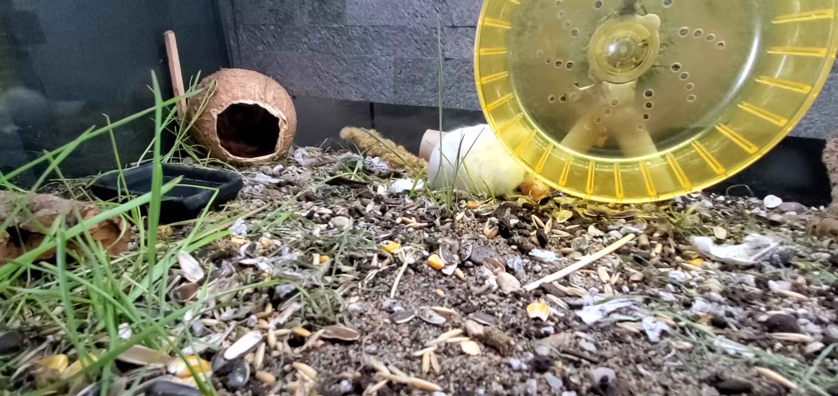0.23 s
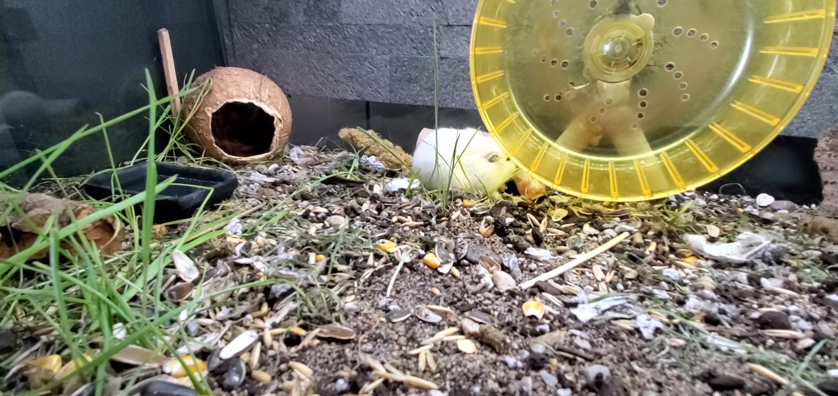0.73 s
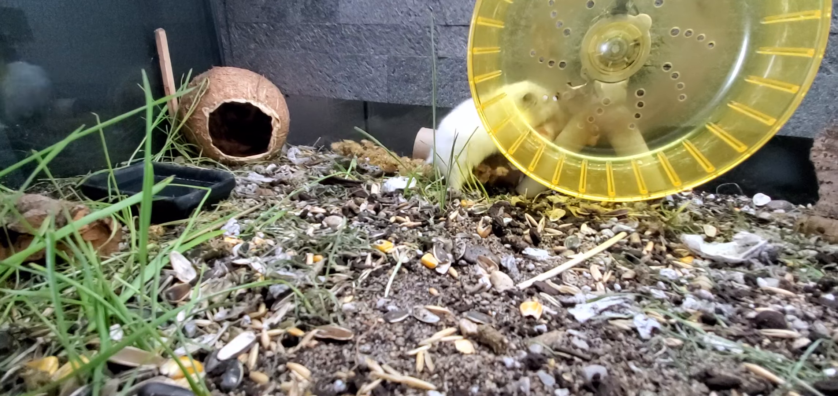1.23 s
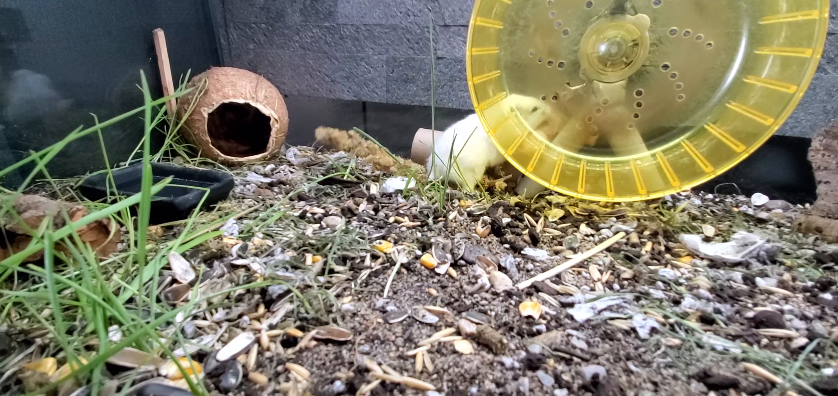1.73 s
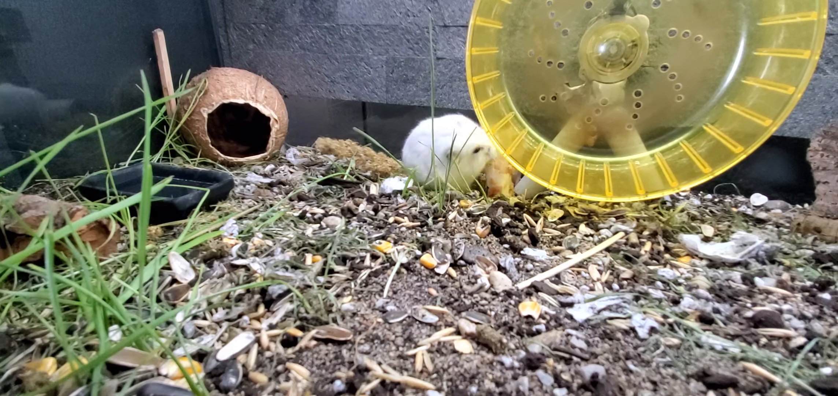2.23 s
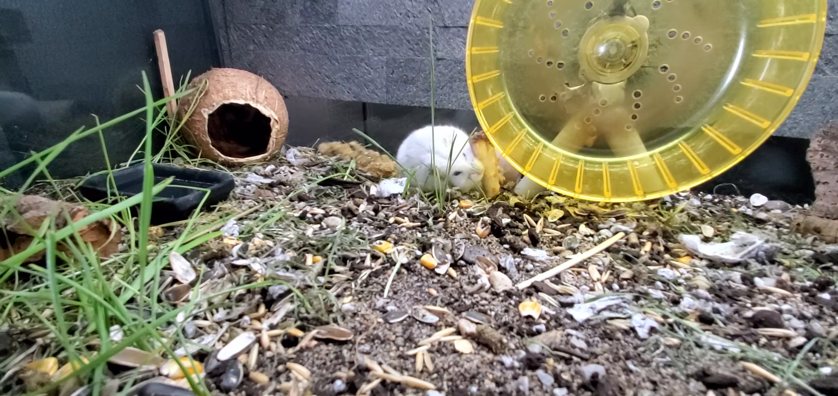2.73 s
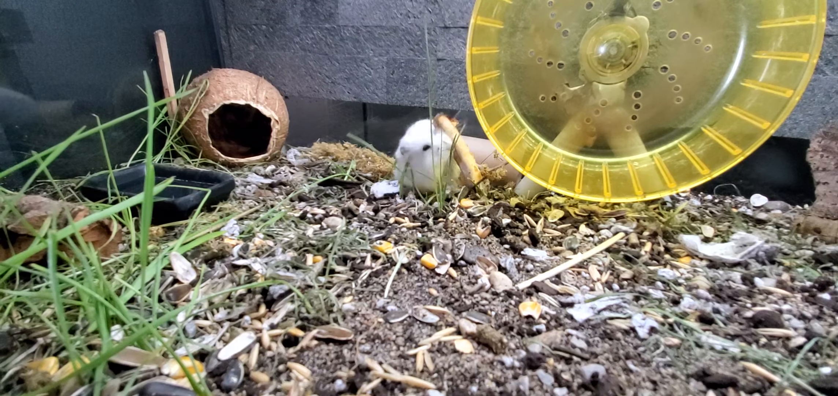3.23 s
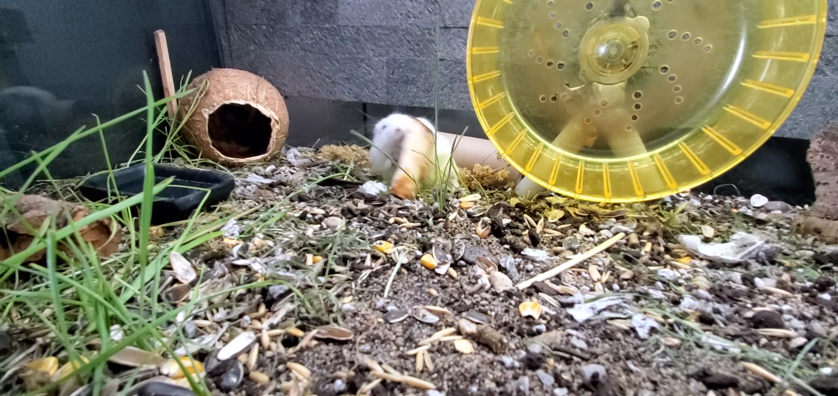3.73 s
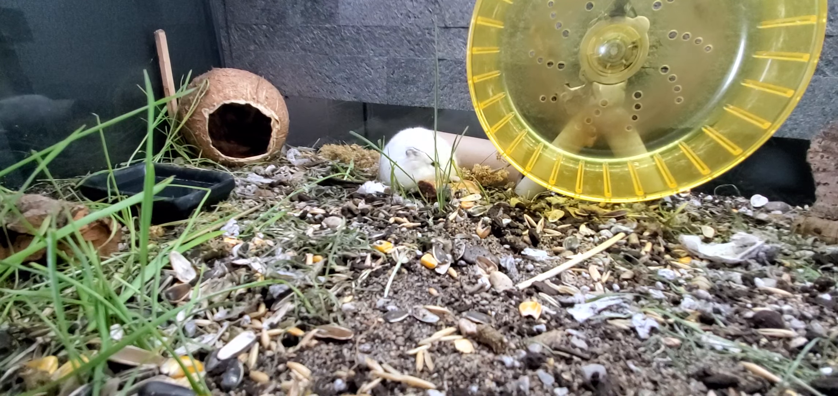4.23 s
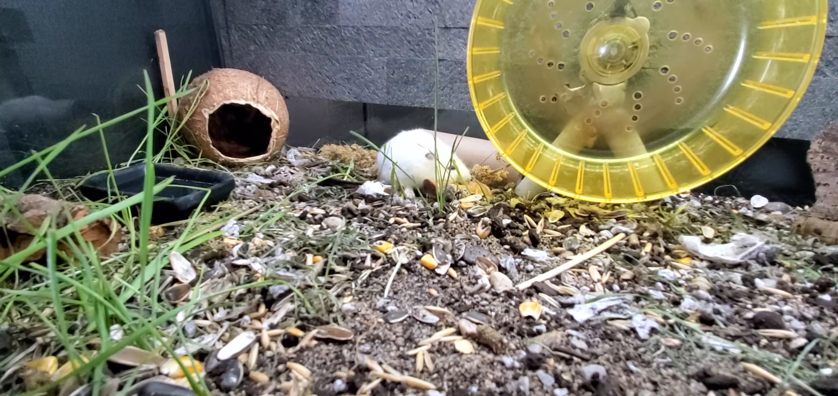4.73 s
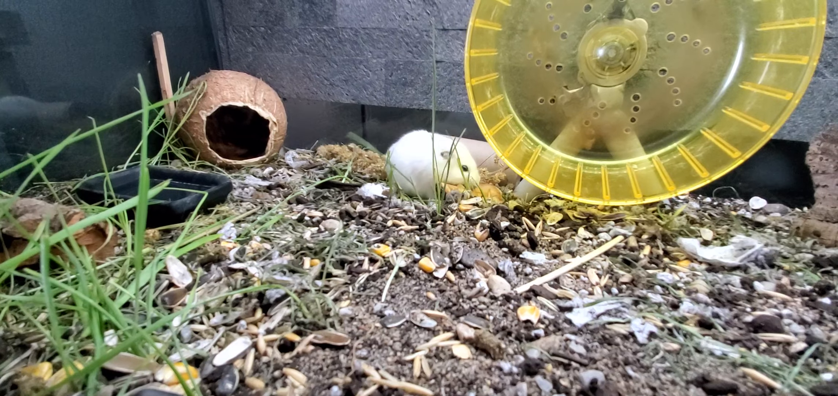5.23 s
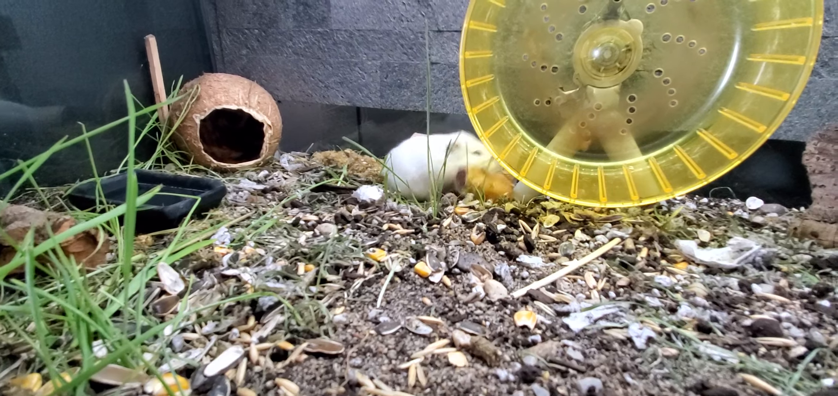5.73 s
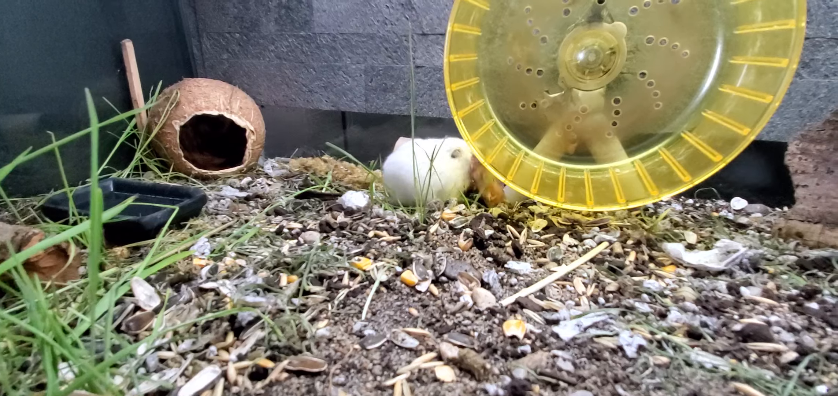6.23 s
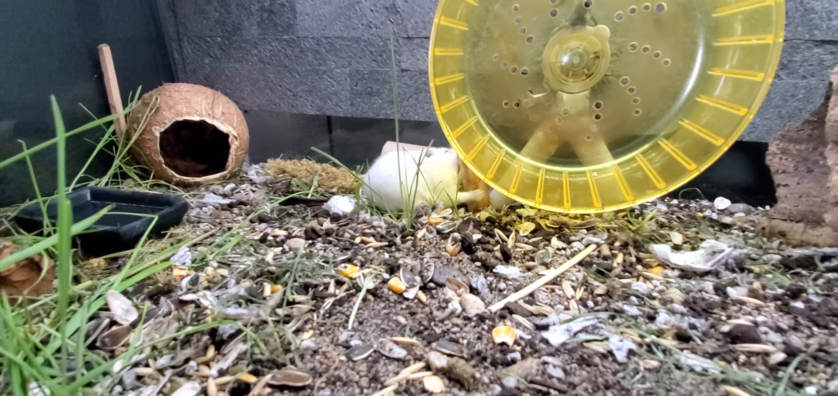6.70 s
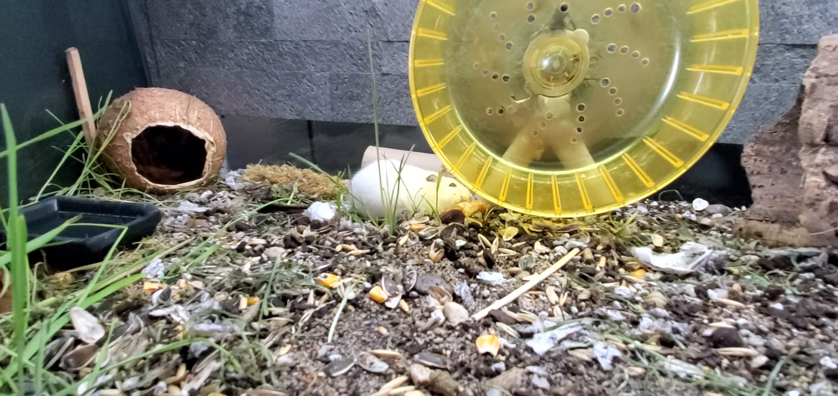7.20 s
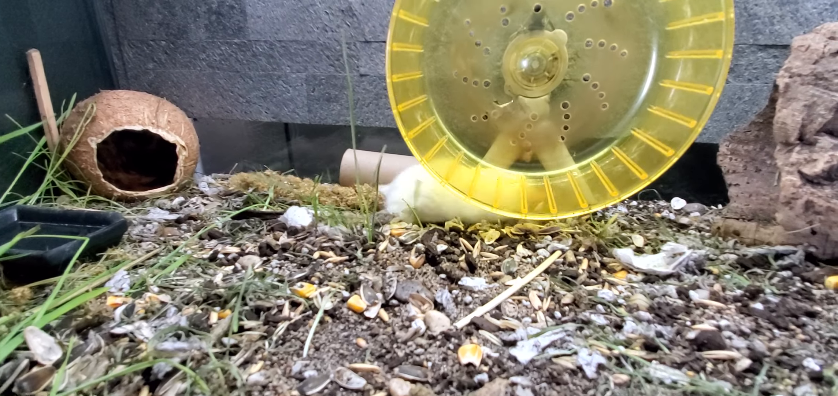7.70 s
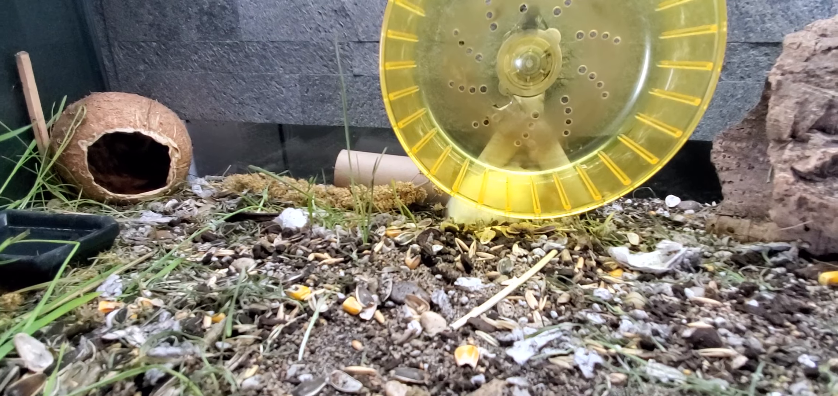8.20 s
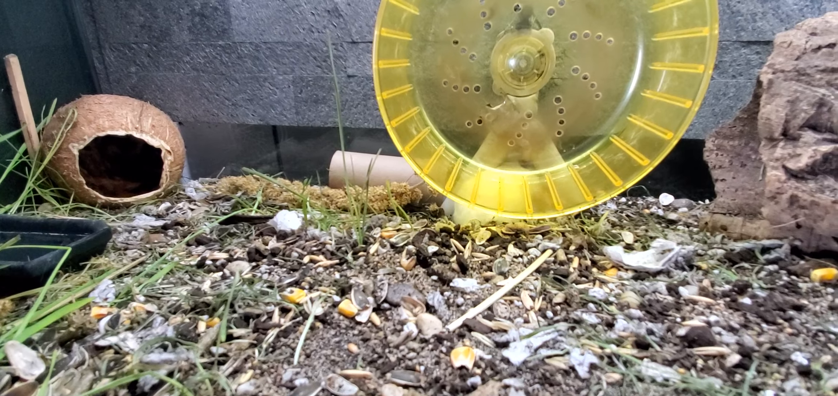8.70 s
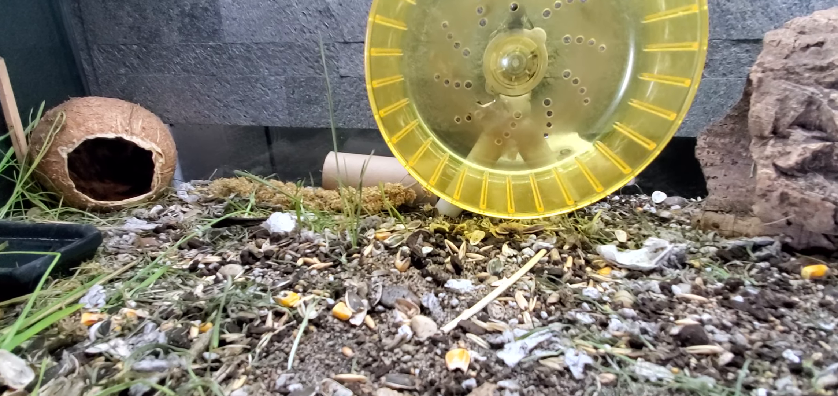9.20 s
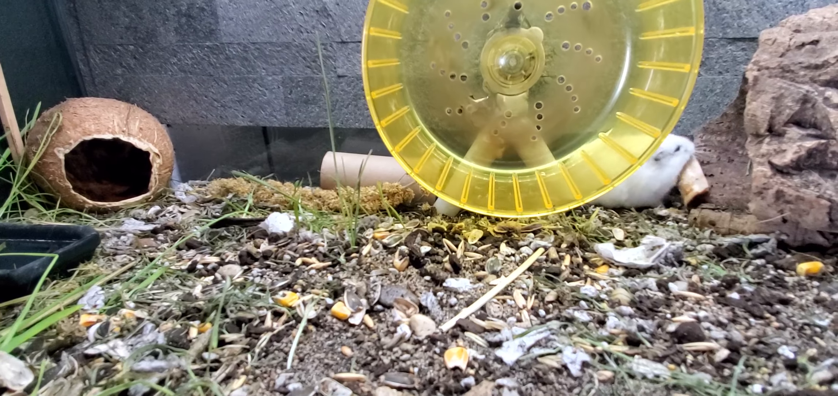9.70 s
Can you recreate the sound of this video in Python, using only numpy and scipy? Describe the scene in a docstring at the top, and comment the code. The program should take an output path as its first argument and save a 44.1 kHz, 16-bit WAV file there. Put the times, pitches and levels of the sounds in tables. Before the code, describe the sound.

Over a steady low hum and rumble, tiny paws crackle in dry bedding, heard from close by with the short echo of a glass tank. Light plastic knocks and brief rubs come from a hamster's wheel at first, then the rustling thins out. A cluster of sharp clacks follows past the halfway point, the scurrying grows busier, and a hollow thump on the wheel's stand finishes it.

```python
"""In a glass tank, a hamster shuffles through dry husks, close to a phone with two microphone ports.
Its paws crunch the bedding: each crunch is a burst of many tiny snaps. What it drags knocks and
rubs on the plastic wheel and bumps its hollow stand, so they ring. The glass adds a short echo.
Behind it all, two motors hum and beat against each other over a low rumble in the room."""
import sys
import numpy as np
from scipy import signal
from scipy.fft import rfft, irfft, next_fast_len
from scipy.io import wavfile
from scipy.ndimage import uniform_filter1d

SR = 44100
rng = np.random.default_rng(int(sys.argv[2]) if len(sys.argv) > 2 else 0)


def master_out(mix):
    """Clip the mix to full scale and print it as 16-bit PCM to the path in sys.argv[1]."""
    frames = np.transpose(np.atleast_2d(mix))
    ceiling = np.clip(frames, -1, 1)
    pcm = np.round(ceiling * 32767).astype(np.int16)
    wavfile.write(sys.argv[1], SR, pcm)


N = 438782
TIME = np.arange(N) / SR
TOP_HZ = 15830  # the highest pitch the phone lets through

# Paw steps. The length is measured 6 dB below the top; "mid" means 4-8 kHz, "treble" is above that.
# t/s of the top, treble level/dB, length/ms, mid against treble/dB
PAW_STEPS = [(.133, -45.5, 6, 0), (.158, -36, 6, -7), (.191, -53.5, 45, -5), (.241, -68, 36, 4),
             (.388, -65, 13, -18), (.412, -69.5, 18, 2), (.503, -59.5, 10, 1), (.525, -71, 30, -3),
             (.557, -70, 18, -1), (.84, -73, 28, -5), (.898, -65, 10, 4), (.969, -66, 29, 1.5),
             (1.039, -67.5, 41, 5), (1.174, -71, 19, 10), (1.287, -53, 20, -8.5), (1.347, -48.5, 19, -6),
             (1.386, -51, 32, -2), (1.493, -63, 20, -4), (1.514, -63, 20, -1), (1.617, -58.5, 17, -4.5),
             (1.634, -52, 7, -7), (1.659, -49, 31, -4.5), (1.689, -45.5, 20, -5), (1.747, -66.5, 29, -1),
             (1.826, -55.5, 20, -7), (1.858, -62, 2, -15), (1.925, -61.5, 48, 1.5),
             (2.003, -62.5, 26, -0.5), (2.083, -65, 39, -3), (2.126, -57, 14, -5), (2.159, -49.5, 23, -2),
             (2.265, -64, 21, -11), (2.288, -54.5, 26, 0), (2.322, -37, 6, -16), (2.366, -57.5, 16, -1),
             (2.413, -63, 46, -2), (2.514, -68.5, 15, 3.5), (2.754, -62, 27, -2), (2.922, -66.5, 60, 1.5),
             (2.995, -60.5, 31, 1.5), (3.081, -62.5, 40, -0.5), (3.216, -68.5, 82, 0),
             (3.46, -64.5, 48, -6), (3.515, -61, 6, -1), (3.56, -54, 51, -5), (3.668, -63, 38, -4),
             (3.713, -62.5, 7, 8.5), (3.746, -63, 33, -5), (3.9, -67, 27, -8), (3.934, -53.5, 19, -1.5),
             (4.723, -68, 7, 7), (4.951, -79, 32, 0), (5.02, -68, 150, 0), (5.164, -66, 31, 2),
             (5.219, -71, 38, -3), (5.677, -71, 41, -2), (5.738, -71, 17, 2), (5.942, -57, 18, 2),
             (6.183, -77, 80, 5), (6.296, -67, 15, 0), (6.34, -62, 27, -5), (6.374, -54, 22, 1),
             (6.417, -46, 18, -4.5), (6.45, -64, 18, -7), (6.485, -53, 47, -3.5), (6.518, -58, 21, 1),
             (6.54, -67, 11, -3), (6.572, -67, 12, 7), (7.126, -53, 9, 0.5), (7.57, -68, 65, 2.5),
             (7.656, -62, 56, 0), (7.727, -59.5, 50, -2), (7.764, -49, 17, -9), (7.79, -53.5, 50, -3.5),
             (7.84, -57, 37, -7), (7.919, -59, 63, -4.5), (8.18, -71, 94, -3), (8.265, -70, 32, -2),
             (8.312, -70, 44, -1), (8.99, -61, 24, -3), (9.015, -55.5, 55, -5), (9.058, -59.5, 26, -10),
             (9.11, -63, 60, -6), (9.251, -41, 16, -6), (9.267, -45, 27, -1.5), (9.297, -46.5, 28, -3),
             (9.343, -51, 18, 3.5), (9.368, -52, 6, 3), (9.449, -63, 57, 0.5), (9.507, -50.5, 16, -10),
             (9.569, -48, 16, -10), (9.598, -45, 35, -6.5), (9.681, -57, 40, -8), (9.718, -63, 18, -9)]
# How hard the body stirs the bedding: t/s, treble level/dB
STIRRING = [(0, -70), (.3, -78), (.72, -87), (1.5, -75.5), (2.24, -75), (2.6, -77), (3.7, -71.5),
            (4.1, -81), (6.2, -77), (6.4, -75), (6.7, -78.5), (7.48, -78), (7.81, -73), (8, -84),
            (8.84, -75), (9.2, -70), (9.73, -82), (9.95, -88)]

def crushing():
    """Body and paws press on the husks; gives the power over time in the treble, mid and low bands."""
    stir_db = np.interp(TIME, *np.transpose(STIRRING))
    flutter_db = 0.38 * walk(35)
    power = undb([stir_db + flutter_db + band_db for band_db in (0, -2, -12)]) ** 2
    for at, db, length_ms, mid_db in [*PAW_STEPS, *faint_steps(stir_db)]:
        span = slice(max(int((at - .3) * SR), 0), min(int((at + .4) * SR), N))
        from_top = 1000 * (TIME[span] - at) / max(length_ms, 4)  # in crunch lengths
        rise = 0.48 * np.clip(length_ms / 25, .3, 1)  # short crunches start more suddenly
        distance = np.where(from_top < 0, -from_top / rise, from_top / (1 - rise))
        swell = 4. ** -(distance ** 1.06)
        low_db = -55.5 + 0.68 * (db + 54) + .5 * mid_db  # the lows grow more slowly than the treble
        power[:, span] += swell * undb([db, db + mid_db, low_db])[:, None] ** 2
    return power


def faint_steps(stir_db, per_second=14):
    """Light steps at random times, a little louder than the stirring; same columns as PAW_STEPS."""
    wait, force, length, tone = rng.random((N // 1000, 4)).T
    at = np.cumsum(-np.log(1 - wait)) / per_second
    db = np.interp(at, TIME, stir_db) + 1 + 4.5 * force
    steps = np.stack([at, db, 11.6 * (.5 + length), -2 + 21 * (tone - .5)], axis=1)
    return steps[at < TIME[-1]]


# The tone of snapping husks: f/Hz, level/dB
HUSK_TONE = [(450, -9), (740, 8.5), (1000, -5), (1500, 5.5), (2020, -3.5), (2400, 4), (2800, 2.5),
             (3400, -2.5), (4300, -6), (5300, -3), (5900, 0.5), (6500, -0.5), (7400, -1), (9200, -11),
             (11300, -4), (13000, -2.5), (15000, 1), (17000, 5.5)]

def husk_snaps(shared=0.14, lag_samples=8, band_hz=731):
    """Thousands of tiny snaps. Chips of each size ring in their own band and give way on their own."""
    left, own = rng.standard_normal((2, N))
    right = np.sqrt(shared) * np.roll(left, lag_samples) + np.sqrt(1 - shared) * own
    snaps = np.array([left, right]) * clusters(size=8, spread_db=2.0)
    size = next_fast_len(N)
    spectrum = rfft(colour(snaps, HUSK_TONE), size)
    band_number = np.fft.rfftfreq(size, 1 / SR) / band_hz
    out = np.zeros((2, N))
    for k in range(int(TOP_HZ / band_hz) + 2):
        band = np.clip(1 - abs(band_number - k), 0, 1)
        out += clusters(size=500, spread_db=2.53) * irfft(spectrum * band, size)[:, :N]
    return out


# Three filters that pick out the treble, mid and low bands, each: f/Hz, level/dB
CRUNCH_BANDS = [
    [(7000, -40), (8000, -3), (8300, 0)],
    [(3400, -40), (4000, -3), (4300, 0), (7700, 0), (8000, -3), (9000, -40)],
    [(3700, 0), (4000, -3), (4700, -40)],
]
# Where the hamster is: t/s, left minus right/dB
HAMSTER_PATH = [(0, 4.5), (7.2, 4.5), (7.9, 2.5), (9, 1), (9.3, 5), (9.6, 2.5), (9.95, 1)]

def bedding():
    """The husks crackle as hard as they are crushed, band by band, and the sound follows the hamster."""
    powers = crushing()
    snaps = husk_snaps()
    crackle = sum(np.sqrt(power) * clusters(size=250, spread_db=spread) * level(colour(snaps, band), 0)
                  for power, band, spread in zip(powers, CRUNCH_BANDS, (1.84, 1.5, 1)))
    return crackle * sides(np.interp(TIME, *np.transpose(HAMSTER_PATH)))


# Knocks on the wheel. Boom lifts or cuts the tones under 750 Hz; slope tilts the ones above.
# t/s, rough peak level/dB, boom/dB, slope/dB per octave, favoured f/Hz, left minus right/dB
WHEEL_KNOCKS = [(.129, -30, -0.5, -7.5, 1320, 3), (.151, -43, -12, -14, 900, 4),
                (1.378, -53, -10, -3, 2940, 8), (1.392, -44, 1.5, -12, 1300, 3),
                (1.514, -35, 7, -5.5, 1670, 5), (1.611, -33.5, -4, -9, 1450, 3),
                (1.674, -47, 10, -4, 750, 9), (1.684, -40, 2, -6.5, 2000, -2),
                (1.8, -42.5, 6.5, -10, 2000, 3), (2.282, -38, 2.5, -12, 750, -0.5),
                (2.366, -40, -2, -11, 1210, 0), (5.938, -20.5, -10, -4, 3020, 0),
                (5.944, -33, -5, -0.5, 2810, 0), (5.965, -43, -14, -7, 2900, 1.5),
                (6.11, -30, -15, -10.5, 2040, 1), (6.127, -46, -18, -9, 750, 9),
                (6.37, -22, -15.5, -3.5, 3430, -2), (6.382, -33.5, -15, -4, 2000, 0.5),
                (6.425, -24.5, -7, -20, 830, 0), (6.435, -40, -9, -14, 750, -2),
                (6.572, -25.5, -14, -7.5, 3840, -3), (6.584, -38.5, -15, -3.5, 780, -2),
                (7.472, -46.5, -9, -13, 750, -4), (7.595, -49, 0, -7, 800, -2),
                (7.643, -40, -17, -8.5, 1700, 2), (7.759, -44, -9, -2, 1500, 3),
                (7.775, -47, -7, -5, 1800, -3), (8.772, -22.5, -19, -13, 1400, 4.5),
                (8.791, -39, -7, -17, 780, -3), (8.894, -50, 10, -0.5, 2500, 2),
                (9.236, -51, 0, -2, 1350, 0), (9.249, -32.5, -8, -4, 1400, 3),
                (9.332, -41.5, -11, -4, 2800, 5)]
# The tones the wheel rings with. Ring time is how long a tone, left free, takes to fade by 60 dB.
# f/Hz, level/dB, ring time/s, left minus right/dB, phase lead of the left/rad
WHEEL_TONES = [(105, -6, 0.18, -2, -6), (259, -7, 0.17, -9, 4.2), (347, -2.5, 0.067, 2, .5),
               (387.4, 0, 0.082, -1.5, 0.47), (476, -5.5, 0.13, -3.5, 2.3), (647, -21, 0.15, 10, -4),
               (700, -1, 0.039, 15, 2), (725, 2, 0.057, -3, 2), (770, 1.5, 0.084, -1, 1.7),
               (959, -1.5, 0.076, 6, 4), (1070, 4, 0.036, -5, -2.), (1213, 2, 0.041, -14, -3),
               (1550, 7.5, 0.031, 7, 2), (1982, 5, 0.039, -19, -2.), (2238, -0.5, 0.084, 5, 4),
               (2894, 11, 0.049, 3, -2.5), (3230, 5, 0.045, -0.5, -2.5), (3230, -4, 0.08, 3, -3.1),
               (3640, 2, 0.043, -12, -1), (4550, 1, 0.043, -1, 4), (4700, -16, 0.046, 2, 17),
               (4910, -5, 0.037, 10, 0), (5700, -16, 0.019, -6, 12)]
# Bumps on the hollow stand: same columns as WHEEL_KNOCKS
STAND_BUMPS = [(9.597, -17.5, 6.9, 1, 600, -5.5), (9.608, -13.5, 4.6, 1, 640, -1),
               (9.621, -26.5, 4.5, 1, 614, -5.5)]
# The tones the stand rings with: same columns as WHEEL_TONES
STAND_TONES = [(340, -8, 0.05, -14, 0.5), (501.5, -9, 0.14, 8, 1.5), (540, -9, 0.078, 6.5, 3),
               (598, 3, 0.039, -8, 0.5), (627, 4.5, 0.076, -7, -2.5), (730, -2, 0.052, -15.5, -3),
               (970, -1, 0.07, 11, -2.5), (1090, -7.5, 0.065, -5.5, 4.5), (1267, -12, 0.06, 2, 1.1),
               (1600, -17, 0.039, -13, 4.5), (2070, -18, 0.041, -8, -5), (2600, -21, 0.062, 0, 1.5)]

def knocks(blows, tones, ring_share, count=40):
    """Struck plastic rings. Each blow lands somewhere new, so it wakes a different mix of tones."""
    out = np.zeros((2, N + SR))
    age = np.arange(SR // 6) / SR
    contact_s, boom_hz, knee_hz = 0.0016, 400, 750
    onset = 1 - (1 + age / contact_s) * np.exp(-age / contact_s)
    main = np.transpose(tones)
    chances = rng.standard_normal((len(blows), 4, len(tones) + count, 1))
    small_pitches = 300 * 20 ** rng.random((len(blows), count))
    for blow, chance, small_hz in zip(blows, chances, small_pitches):
        at, peak_db, boom_db, slope_db, favoured_hz, pan_db = blow
        spot, detune, lean, phase = chance
        # a crowd of weak, short tones joins the main ones
        small_db = np.interp(small_hz, main[0], main[1]) - 11
        small = [small_hz, small_db, np.full(count, .035), 5 * lean[:count, 0], np.pi * phase[:count, 0]]
        hz, db, ring_s, tone_pan_db, lead = np.hstack([main, small])[:, :, None]
        bass_db = np.interp(np.log(hz), np.log([boom_hz, knee_hz]), [boom_db, 0])
        tilt_db = slope_db * np.log2(np.maximum(hz / knee_hz, 1))
        favour_db = 6 * np.exp(-.5 * (np.log2(hz / favoured_hz) / 0.31) ** 2)
        tone_db = peak_db - 4 + db + bass_db + tilt_db + favour_db + 1.8 * spot
        fade_rate = np.log(1000) / (ring_s * ring_share)
        ringing = np.exp((2j * np.pi * hz * (1 + 0.019 * detune) - fade_rate) * age)
        start = int(at * SR)
        for channel, side in enumerate((.5, -.5)):
            weight = undb(tone_db + side * (tone_pan_db + pan_db)) * np.exp(1j * side * lead)
            out[channel, start:start + len(age)] += onset * np.imag(weight[:, 0] @ ringing)
    return out[:, :N]


# Fur and the dragged piece rub the wheel: t/s, length/ms, low ring level/dB, high against low/dB
WHEEL_RUBS = [(.94, 60, -54, -18), (1.078, 120, -60, -18), (1.39, 25, -56, -4), (1.83, 40, -60, -16),
              (1.95, 77, -54.5, -14), (6.12, 120, -73, 8), (6.46, 63, -55.5, -7), (7.52, 240, -65.5, -2.5),
              (7.758, 39, -59, 6), (7.81, 100, -61, -2), (9.102, 160, -60.5, -7), (9.237, 38, -51, 7.5),
              (9.29, 18, -58, -2), (9.332, 34, -52, 6.5), (9.385, 24, -49.5, -5)]
# The low and the high ring of the rubbed wheel, each: f/Hz, level/dB
LOW_RING = [(300, -27), (400, 3.5), (520, -15), (740, 4), (900, -16), (1050, -0.5), (1300, -44)]
HIGH_RING = [(1300, -31), (1550, -7.5), (1750, -4), (1980, -1), (2350, -13), (2800, 1), (3150, -17),
             (3500, -14), (3900, -21.5)]

def rubbing(catch_db_per_s=2000, release_db_per_s=600):
    """Sticking and slipping shakes the wheel. A rub catches suddenly and lets go more slowly."""
    out = np.zeros((2, N))
    slips = rng.standard_normal((2, N)) * clusters(size=150, spread_db=2.5)
    low, high = level(colour(slips, LOW_RING), 0), level(colour(slips, HIGH_RING), 0)
    for start, length_ms, db, high_db in WHEEL_RUBS:
        before_db = catch_db_per_s * np.maximum(start - TIME, 0)
        after_db = release_db_per_s * np.maximum(TIME - start - length_ms / 1000, 0)
        out += undb(db - before_db - after_db) * (low + undb(high_db) * high)
    return out


def tank(x, ring_s=0.21, echo_db=-20.5):
    """The glass walls throw the sound back as a short, blurred echo."""
    age = np.arange(SR // 3) / SR
    tail = rng.standard_normal((2, len(age))) * 1000. ** (-age / ring_s) * (age > .003)
    tail /= np.sqrt(np.sum(tail ** 2, axis=1, keepdims=True))
    return x + undb(echo_db) * signal.fftconvolve(x, tail, axes=1)[:, :N]


# The tones of the two motors: f/Hz, level/dB, left minus right/dB, t/s of one wave crest
MOTOR_TONES = [(57.89, -53, -1.5, -.011), (59.4, -57, -1, -.012), (90, -63, -2, .003), (120, -60, 1, 0),
               (231.5, -62, 6, 0)]

def motors(waver_db=.8):
    """Shafts and mains power hum, wavering slowly. The two closest tones beat: they swell and fade."""
    out = np.zeros((2, N))
    for hz, db, pan_db, crest in MOTOR_TONES:
        strength = np.sqrt(2) * undb(db + waver_db * walk(0.67))
        out += strength * np.cos(2 * np.pi * hz * (TIME - crest)) * sides(pan_db)[:, None]
    return out


# The tone of the room's rumble: f/Hz, level/dB
RUMBLE_TONE = [(20, -21), (35, -3.5), (48, -7.5), (66, 4), (78, 0.5), (88, 0), (108, 9.5), (125, 9),
               (145, 8), (154, 6.5), (170, 9), (190, 2.5), (200, 2.5), (222, -5.5), (260, -14), (320, -57)]
# How the rumble rises and falls: t/s, level/dB
RUMBLE_LEVELS = [(0, -43.5), (1.1, -44.5), (1.7, -41.5), (3, -44), (5.5, -45), (6, -42.5), (9.95, -43)]
# Faint hiss, alike and opposite in the two channels, with a gap near 8-10 kHz, each: f/Hz, level/dB
HISS_ALIKE = [(150, -17), (236, -4), (268, -8), (328, -7.5), (529, -10.5), (671, -14.5), (791, -10),
              (916, -21.5), (1450, -26), (1950, -18.5), (2090, -16.5), (2300, -21), (4600, -28.5),
              (7200, -37), (8200, -44), (9800, -79), (12000, -70), (16000, -69)]
HISS_OPPOSITE = [(150, -40), (236, 2), (259, -15), (340, -0.5), (401, -12.5), (465, -6.5), (722, -5.5),
                 (1040, -11.5), (1500, -19.5), (2050, -15.5), (2510, -17), (4600, -25.5), (7200, -32),
                 (8200, -51), (9800, -44), (12000, -45), (16000, -47)]
# How differently the two ports hear the room: f/Hz, left minus right/dB
PORT_BALANCE = [(60, -3), (110, -1), (200, 1.5), (380, -5.5), (700, 1.5), (1290, -4), (2380, 3.5),
                (4400, 0.5), (7000, 5), (9000, 5), (15000, -7)]

def room():
    """A low rumble that both ports hear nearly alike, and a faint hiss that differs left and right."""
    noise = rng.standard_normal((4, N))
    opposite = np.array([[1], [-1]])
    rumble = level(colour(noise[0], RUMBLE_TONE), 0)
    rumble = rumble + opposite * level(colour(noise[1], RUMBLE_TONE), -21)
    rumble *= undb(np.interp(TIME, *np.transpose(RUMBLE_LEVELS)))
    hiss = level(colour(noise[2], HISS_ALIKE), -59)
    hiss = hiss + opposite * level(colour(noise[3], HISS_OPPOSITE), -57.5)
    hiss *= undb(1.2 * walk(6.4))
    return np.array([colour(channel, [(hz, side * db) for hz, db in PORT_BALANCE])
                     for channel, side in zip(rumble + hiss, (.5, -.5))])


def undb(db):
    """Turn decibels into a number to multiply by."""
    return 10 ** (np.asarray(db) / 20)


def level(x, db):
    """Scale a sound to an average (rms) level."""
    return x * undb(db) / np.sqrt(np.mean(x ** 2))


def colour(x, points):
    """Shape the tone of a sound with a curve through (f/Hz, level/dB) points."""
    size = next_fast_len(N)
    hz, db = np.transpose(points)
    log_hz = np.log(np.maximum(np.fft.rfftfreq(size, 1 / SR), 1))
    gain = undb(np.interp(log_hz, np.log(hz), db))
    return irfft(rfft(x, size) * gain, size)[..., :N]


def walk(rate):
    """A smooth random wobble, about 1 in size, with `rate` new values a second."""
    hold = int(SR / rate)
    steps = np.repeat(rng.standard_normal(N // hold + 1), hold)
    return 1.3 * uniform_filter1d(uniform_filter1d(steps, hold), hold)[:N]


def clusters(size, spread_db):
    """Uneven strength in clumps of `size` samples: most are small, a few stand out."""
    strengths = np.repeat(undb(spread_db * rng.exponential(size=N // size + 1)), size)[:N]
    return level(uniform_filter1d(strengths, size), 0)


def sides(pan_db):
    """Left and right gains for a level difference between the two."""
    return undb(np.array([pan_db, -pan_db]) / 2)


def scene():
    """The hamster's sounds echo in the tank, over the room and the motors."""
    wheel = knocks(WHEEL_KNOCKS, WHEEL_TONES, ring_share=0.82)
    stand = knocks(STAND_BUMPS, STAND_TONES, ring_share=0.67)
    return tank(bedding() + rubbing() + wheel + stand) + room() + motors()


def record(dry):
    """The phone cuts off the highest treble."""
    return signal.sosfilt(signal.ellip(10, .2, 60, TOP_HZ, fs=SR, output="sos"), dry)


dry = scene()
out = record(dry)
master_out(out)
```